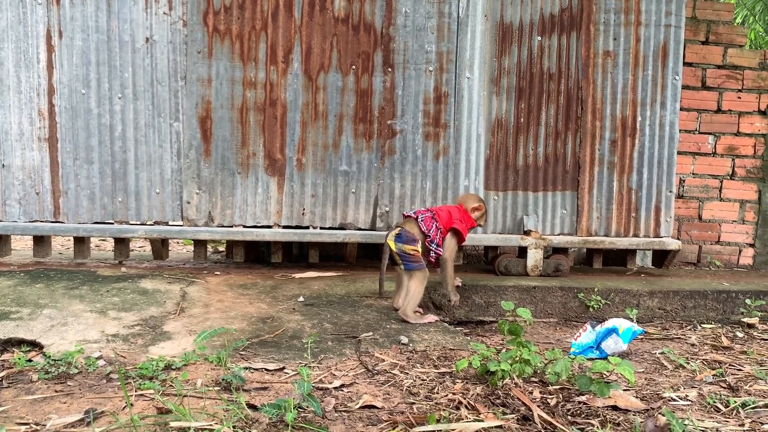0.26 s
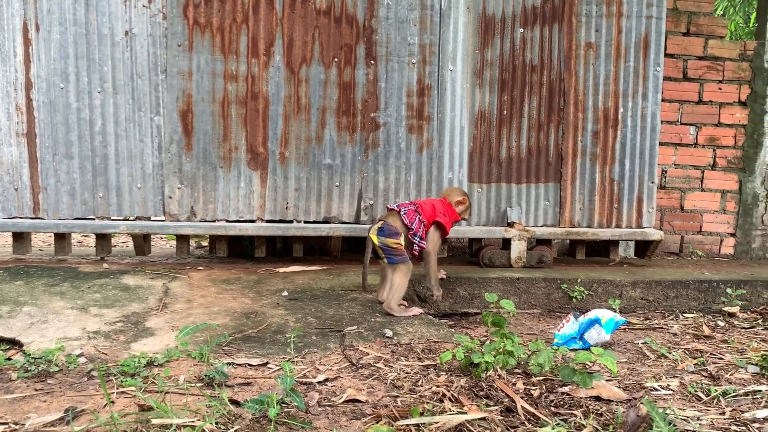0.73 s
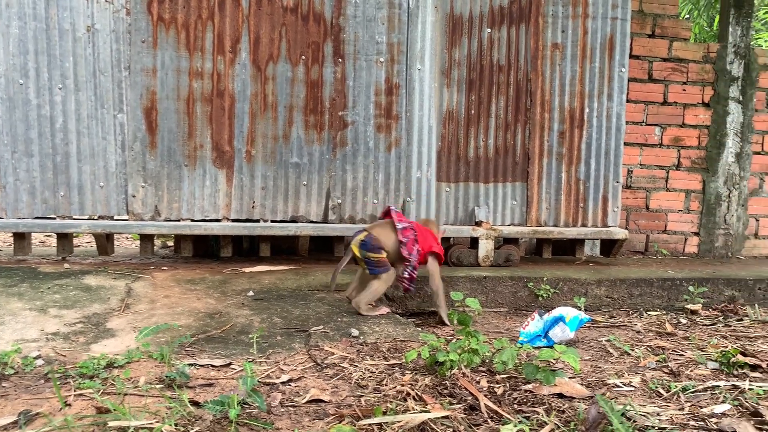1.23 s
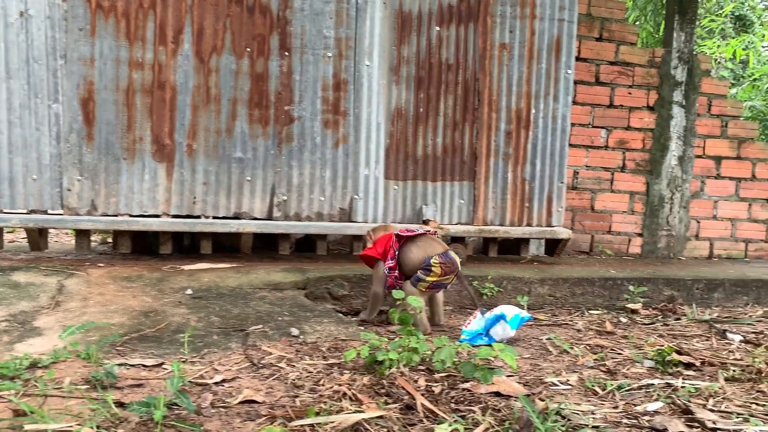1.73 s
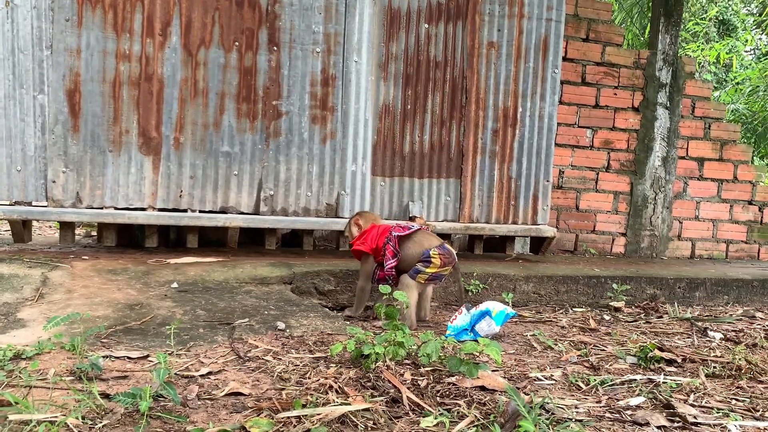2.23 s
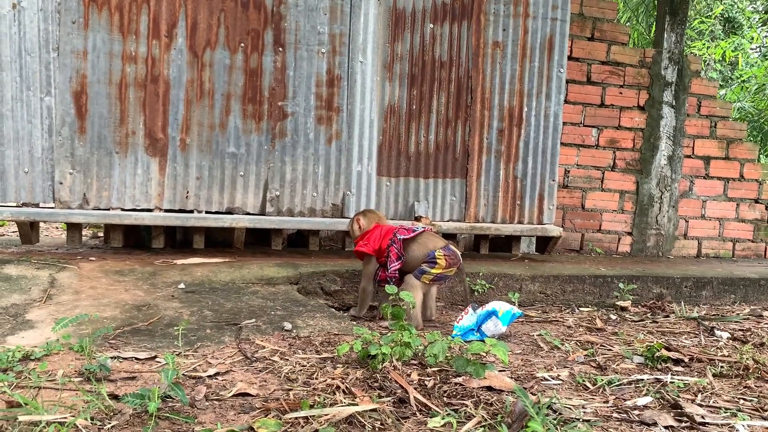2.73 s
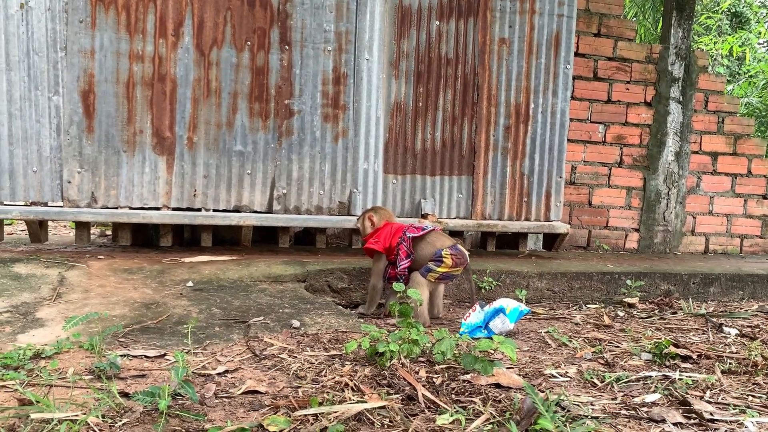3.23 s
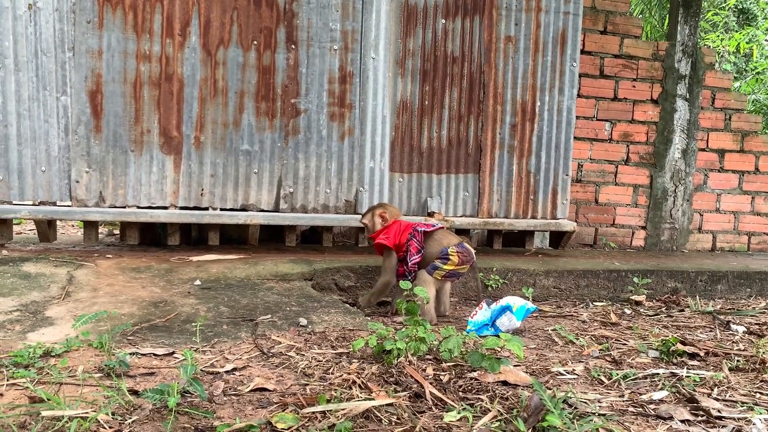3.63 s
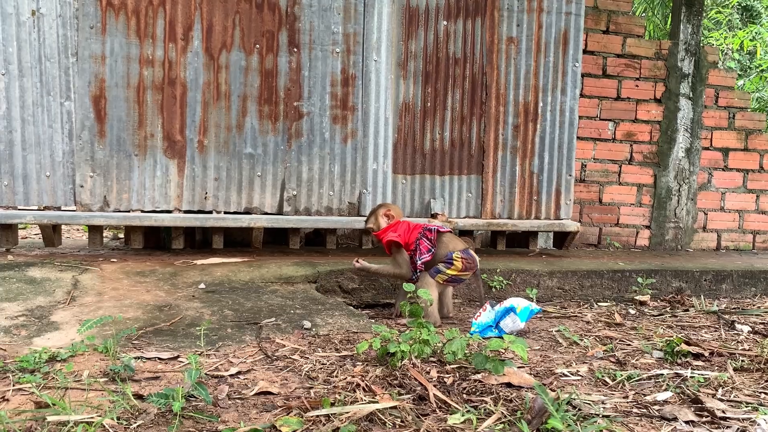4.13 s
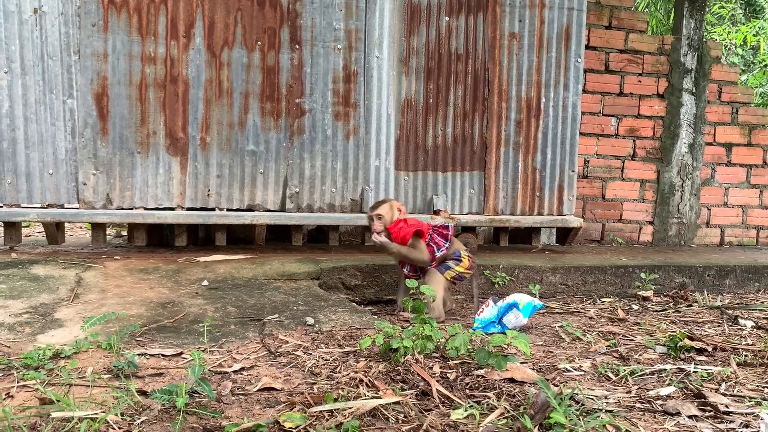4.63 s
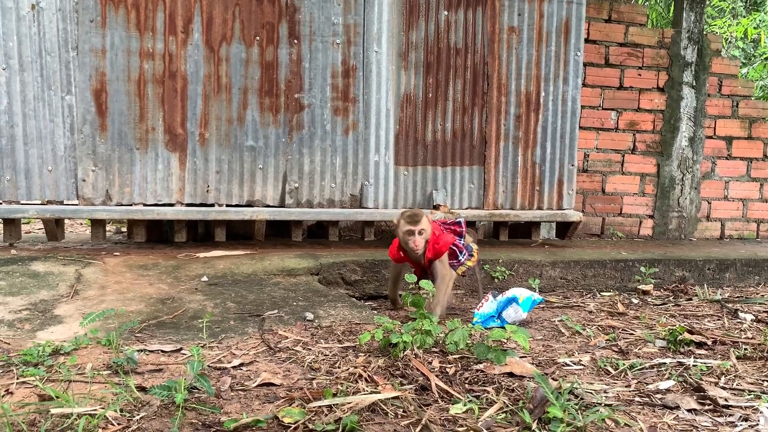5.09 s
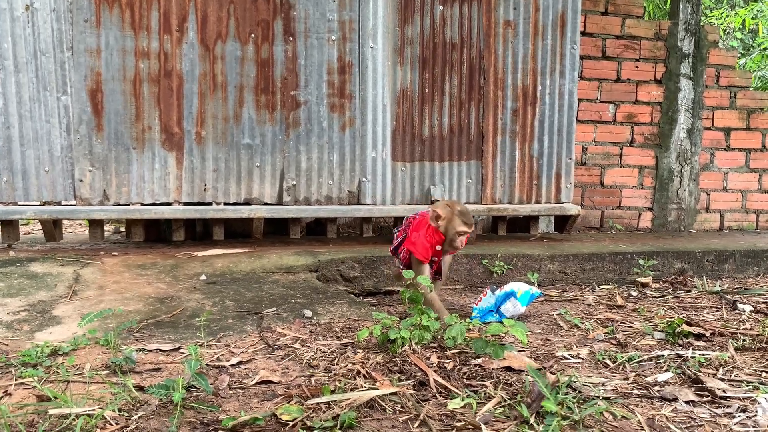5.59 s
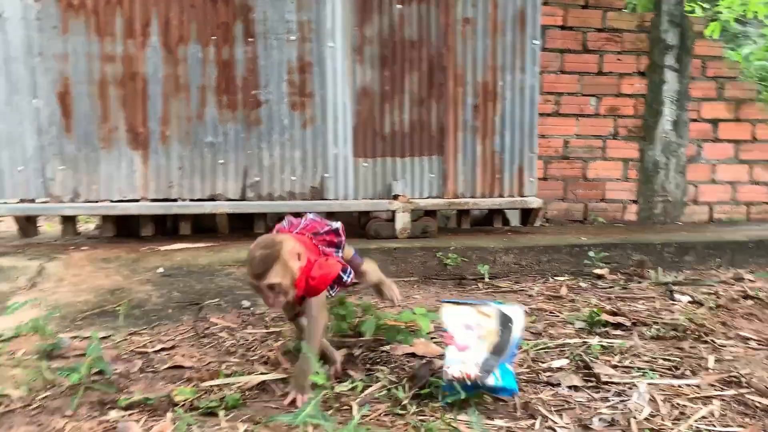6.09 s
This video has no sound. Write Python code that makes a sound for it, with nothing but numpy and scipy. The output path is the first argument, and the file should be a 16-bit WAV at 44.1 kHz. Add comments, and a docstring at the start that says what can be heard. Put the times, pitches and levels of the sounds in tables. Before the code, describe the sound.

A quiet village yard heard in stereo, with low airy rumble, faint hiss and distant engine drone. From the start, chicks give short falling peeps about three times a second until 2 seconds, mixed with quick chirps and thin high notes; sparser chirps and clear, held whistles continue throughout, a longer whistle around 5. Walls return a short, diffuse echo. Hoarse roosters crow faintly far off, drawn out and wavering. High insects sizzle softly, one throbbing about eight times a second, fading after 3. Dull soft thuds fall at 0.2 and 0.8, a tight cluster of knocks at 3.8, another thud at 4.9. Engines swell a little after 4. Knocks at 5.9 precede an abrupt silence of a twentieth of a second; from 6.0 to the end, at about 6.3, paws rustle crisply through dry leaves nearby, with snapping twigs, hollow knocks and one last chirp.

```python
"""A village yard: chicks and small birds peep between walls, roosters crow far off, insects sing, traffic rumbles.
Bird voices are sines on gliding pitch curves, and a decaying noise tail gives the walls' echo. Knocks ring a damped
mode; insects are ticks through resonances; traffic, leaves and air are shaped noise.
Near the end the sound drops out for a moment, then an animal rustles close by through dry leaves."""
import sys
import numpy as np
from scipy import signal
from scipy.io import wavfile
from scipy.ndimage import uniform_filter1d

SR = 44100
rng = np.random.default_rng(int(sys.argv[2]) if len(sys.argv) > 2 else 0)


def transcribe(u):
    """Save the signal u as a 16-bit wav file named by the first command-line argument.

    u: samples, shape (n,) or (channels, n), limited to [-1, 1]; the rate is SR.
    q: integer samples, one column per channel.
    """
    v = np.clip(np.atleast_2d(u).T, -1, 1)
    q = np.round(v * 32767).astype(np.int16)
    wavfile.write(sys.argv[1], SR, q)


N = 280035


def from_db(db):
    """Decibels to gain."""
    return 10 ** (np.asarray(db) / 20)


def rms_one(x):
    """Scale to unit rms."""
    return x / np.sqrt(np.mean(x ** 2) + 1e-20)


def in_time(rows):
    """Every column of a curve table at every sample."""
    s, *columns = np.transpose(rows)
    return [np.interp(np.arange(N) / SR, s, column) for column in columns]


def at_hz(points, hz):
    """Read a spectrum on a log-frequency axis."""
    point_hz, values = np.array(points).T
    return np.interp(np.log(hz), np.log(point_hz), values)


def drift(rate_hz):
    """Random wander of rms 1: noise through two equal low-pass poles, drawn every 20 samples."""
    r = np.exp(-40 * np.pi * rate_hz / SR)
    noise = rng.standard_normal(N // 20 + 4002)
    slow = signal.lfilter([1], [1, -2 * r, r * r], noise)[4000:]   # skip the filter's start
    return np.interp(np.arange(N) / 20, np.arange(len(slow)), rms_one(slow))


def resonance(x, hz, width_hz):
    """Two-pole resonance with a gain of about 1 at its peak."""
    r = np.exp(-np.pi * width_hz / SR)
    poles = [1, -2 * r * np.cos(2 * np.pi * hz / SR), r * r]
    return signal.lfilter([(1 - r * r) / 2, 0, (r * r - 1) / 2], poles, x)


def placed(x, pan_db):
    """Set a source in stereo: the left leads by ten samples and is louder by pan_db."""
    return np.array([np.roll(x, -10) * from_db(pan_db / 2), x * from_db(-pan_db / 2)])


def stereo_noise(alike):
    """Two white noises that share a part."""
    mid, side = rng.standard_normal((2, N))
    alike = np.clip(alike, -1, 1)
    return np.sqrt(.5 + alike / 2) * mid + np.sqrt(.5 - alike / 2) * side * [[1], [-1]]


def banded(spectrum, patchy_db, grains=1):
    """Third-octave bands of stereo noise, each with its own level, flicker and likeness; rms 1."""
    # How alike the two channels are: f/Hz, left-right likeness
    likeness = [(60, 0.84), (240, 0.85), (950, 0.27), (3770, -0.11), (15000, -0.59)]
    out = 0
    edges = 35 * 2 ** (np.arange(27) / 3)
    white = rng.standard_normal((2, 2, N)) * grains
    for k, (low, high) in enumerate(zip(edges, edges[1:])):
        band = signal.butter(2, [low, high], "band", fs=SR, output="sos")
        mid, side = signal.sosfilt(band, white[k % 2])   # neighbouring bands use different noise
        hz = np.sqrt(low * high)
        alike = np.clip(at_hz(likeness, hz), -1, 1)
        gain = from_db(at_hz(spectrum, hz) + patchy_db * drift(3.58))
        out = out + gain * (np.sqrt(1 + alike) * mid + np.sqrt(1 - alike) * side * [[1], [-1]])
    return rms_one(out)


def held_tones(tables, waver, flutter_db, rate_hz, fade_s, octave_db=-58.0):
    """Sines on a pitch curve with a faint octave; pitch and level tremble, the ends fade."""
    out = np.zeros(N)
    tremble = 1 + waver * drift(rate_hz)
    flutter = from_db(flutter_db * drift(rate_hz))
    for rows in tables:
        s, hz, level_db = np.transpose(rows)
        span = slice(round(s[0] * SR), min(round(s[-1] * SR), N))
        t = np.arange(N)[span] / SR
        fade = np.clip(np.minimum(t - s[0], s[-1] - t) / fade_s, 0, 1)
        pitch = uniform_filter1d(np.interp(t, s, hz), size=400, mode="nearest")   # the syrinx rounds every bend
        phase = 2 * np.pi * np.cumsum(pitch * tremble[span]) / SR
        voice = np.sin(phase) + from_db(octave_db) * np.sin(2 * phase)
        level = np.sqrt(2) * from_db(np.interp(t, s, level_db))   # table levels are rms
        out[span] += level * flutter[span] * fade * voice
    return out


def peep(start, length, top_hz, db):
    """One straight fall in pitch whose level curve starts high and sinks; the voice fades its ends."""
    end_hz, start_db, end_db = 2476, 9.5, -2   # levels relative to the middle
    return [(start, top_hz, db + start_db),
            (start + length / 2, (top_hz + end_hz) / 2, db),
            (start + length, end_hz, db + end_db)]


def chirp(start, glide, top_hz, knee_hz, end_hz, db):
    """A glide slows towards a knee, then drops quickly; the throat sets the level at each pitch."""
    # Throat resonances: f/Hz, gain/dB
    throat = [(1700, 9), (2400, 13), (2900, -9), (3450, 0), (3900, -0.5), (4500, -1.5), (5400, -10)]
    glide_bend, drop_s = 1.3, 0.024
    t = np.linspace(0, glide + drop_s, 30)
    hz = knee_hz + (top_hz - knee_hz) * np.clip(1 - t / glide, 0, 1) ** glide_bend
    hz = hz - (knee_hz - end_hz) * np.clip((t - glide) / drop_s, 0, 1)
    return np.transpose([start + t, hz, db + at_hz(throat, hz)])


def slide(start, length, first_hz, last_hz, db, fade_db=0):
    """A straight slide in pitch and level."""
    return [(start, first_hz, db), (start + length, last_hz, db + fade_db)]


def small_birds():
    """Peeps, chirps and high notes share one trembling voice with a clear octave."""
    # Short peeps: start t/s, length/s, top f/Hz, middle level/dB before the mix
    peep_rows = [(0.173, 0.066, 4550, -65.5), (0.542, 0.062, 4650, -63.5), (0.906, 0.09, 4546, -67.5),
                 (1.255, 0.058, 4620, -63.5), (1.601, 0.086, 4610, -67.5), (1.962, 0.067, 4404, -67.5),
                 (3.388, 0.046, 4050, -76.5), (3.621, 0.1, 4360, -80)]
    # Chirps: start t/s, glide/s, top f/Hz, knee f/Hz, end f/Hz, level/dB before throat and mix
    chirp_rows = [(0.474, 0.08, 4473, 3985, 3830, -67), (1.071, 0.1, 4595, 3527, 2280, -66.5),
                  (1.495, 0.066, 4270, 3260, 2830, -63.5), (2.164, 0.08, 4460, 3480, 2190, -63.5),
                  (2.319, 0.043, 4400, 3400, 3120, -63.5), (2.442, 0.05, 4375, 3380, 2540, -59),
                  (2.63, 0.056, 4020, 3780, 1680, -72.5), (3.0, 0.12, 5100, 3366, 2256, -62),
                  (3.234, 0.034, 4400, 3510, 2134, -65.5), (4.323, 0.068, 4030, 3390, 2280, -64),
                  (4.557, 0.065, 4680, 3380, 3080, -65), (4.641, 0.075, 5090, 3900, 2980, -74.5),
                  (4.778, 0.043, 4435, 3860, 1870, -71), (5.169, 0.073, 4960, 3650, 3270, -65.5),
                  (5.563, 0.048, 4655, 4310, 3450, -66), (2.69, 0.064, 4590, 3420, 3120, -67),
                  (5.82, 0.13, 5290, 3470, 3100, -68), (6.273, 0.085, 4815, 3630, 3000, -58.5)]
    # High thin notes, mostly leading into a chirp: start t/s, length/s, first f/Hz, last f/Hz,
    # starting level/dB before the mix
    high_rows = [(0.418, 0.057, 5860, 5080, -67), (0.566, 0.032, 6200, 5680, -71),
                 (1.007, 0.089, 5950, 4920, -69.5), (1.165, 0.057, 5680, 4780, -66),
                 (1.431, 0.069, 5450, 5206, -65.5), (2.102, 0.15, 5640, 5100, -75.5),
                 (2.384, 0.07, 5620, 5660, -62.5), (2.955, 0.072, 5400, 5290, -64.5),
                 (1.48, 0.06, 4770, 4760, -67), (2.556, 0.055, 4520, 4370, -71),
                 (4.262, 0.064, 5230, 4640, -68), (5.127, 0.047, 5260, 4800, -71),
                 (5.52, 0.045, 6420, 4950, -69), (5.547, 0.054, 4800, 4710, -68)]
    notes = [peep(*row) for row in peep_rows]
    notes += [chirp(*row) for row in chirp_rows]
    notes += [slide(*row, fade_db=-12) for row in high_rows]
    return held_tones(notes, waver=.017, flutter_db=4.0, rate_hz=220, fade_s=.017, octave_db=-26.0)


def whistle(start, length, onset_hz, held_hz, end_hz, db):
    """Settles on its note, slides with gathering speed, swells and fades."""
    settle_s, bend = 0.0334, 2.1
    swell_peak, start_db, end_db = 0.49, -10, -6.5   # peak as a share of the length
    t = np.linspace(0, length, 30)
    hz = np.interp(t, [0, settle_s], [onset_hz, held_hz])
    hz = hz + (end_hz - held_hz) * (t / length) ** bend
    swell_db = np.interp(t / length, [0, swell_peak, 1], [start_db, 0, end_db])
    return np.transpose([start + t, hz, db + swell_db])


def whistles():
    """Held bird notes: near-pure sines with a gentle tremble."""
    # Whistles: start t/s, length/s, onset f/Hz, held f/Hz, end f/Hz, peak level/dB before flutter
    rows = [(0.721, 0.19, 3500, 3460, 3715, -68), (1.62, 0.26, 3900, 3683, 3555, -64),
            (1.907, 0.1, 3900, 4020, 3870, -60.5), (2.77, 0.11, 3580, 3670, 3595, -61),
            (3.817, 0.28, 3850, 3690, 3190, -67), (4.148, 0.15, 3950, 3766, 3820, -64),
            (4.94, 0.48, 3760, 3696, 3897, -64.5), (5.371, 0.17, 4050, 4020, 3544, -64),
            (6.006, 0.14, 3660, 3685, 3655, -60)]
    return held_tones([whistle(*row) for row in rows], waver=.008, flutter_db=2.5, rate_hz=45, fade_s=.031)


def roosters():
    """Far crowing: held partials that waver, in a hoarse haze that follows their loudness."""
    # Partials of the crows: start t/s, length/s, first f/Hz, last f/Hz, level/dB before flutter and mix
    rows = [(.3, 0.33, 1536, 1634, -75), (.55, 0.7, 1670, 1664, -75), (1.05, 0.31, 1745, 1780, -80),
            (.88, 0.16, 746, 758, -66), (1.25, 0.49, 1550, 1583, -76.5), (.6, 0.73, 878, 871, -78.5),
            (1.5, 1.39, 947, 995, -78), (1.8, 0.19, 1930, 1795, -79), (2.4, 0.7, 1643, 1693, -74.5),
            (3.97, 2.14, 1523, 1502, -76), (4.0, 0.486, 818, 828, -76), (4.95, 0.87, 1150, 1190, -78),
            (5.5, 0.26, 1593, 1576, -74), (5.1, 0.19, 485, 470, -72.5), (5.2, 0.52, 818, 777.5, -70),
            (5.28, 0.1, 1670, 1656, -60)]
    partials = held_tones([slide(*row) for row in rows], waver=.024, flutter_db=5.5, rate_hz=45, fade_s=.1)
    loudness = uniform_filter1d(np.abs(partials), size=8000)
    partials = partials * from_db(3 * drift(8) - 1.5)   # the crows' level flutters unevenly
    noise = rng.standard_normal(N)
    low_haze = 0.88 * rms_one(resonance(noise, 720, 400))
    high_haze = 0.47 * rms_one(resonance(noise, 1370, 500))
    return partials + loudness * (low_haze + high_haze)


def knocks():
    """Dull knocks on the ground: each a soft blow on one damped mode, with a puff of grit."""
    # Blows: t/s, nominal level/dB before the mix, ring f/Hz
    blows = [(0.172, -42.5, 341), (0.2, -42.5, 362), (0.783, -45.5, 374), (0.81, -48.5, 355),
             (3.738, -52, 950), (3.755, -42.5, 925), (3.763, -44, 790), (3.773, -41, 535),
             (3.78, -37.5, 950), (3.79, -44, 584), (3.8, -43, 950), (4.918, -46.5, 386),
             (4.945, -48.5, 367), (5.872, -39.5, 950), (5.889, -45, 920), (5.908, -31, 924),
             (6.017, -38.5, 875), (6.024, -30.5, 900), (6.028, -27.5, 1320), (6.068, -44, 870),
             (6.133, -41, 820), (6.139, -38.5, 980), (6.187, -33.5, 1360), (6.22, -40, 870),
             (6.225, -33, 1320)]
    cycles_to_60_db = 19.5
    out = np.zeros(N)
    grit = rms_one(resonance(resonance(rng.standard_normal(N), 900, 1500), 900, 1500))
    for start, level_db, hz in blows:
        i = round(start * SR)
        t = np.arange(min(SR // 5, N - i)) / SR
        ring = np.sin(2 * np.pi * hz * t) * from_db(-60 * t * hz / cycles_to_60_db)
        puff = 0.097 * hz / 900 * grit[i:i + len(t)] * np.exp(-t / 0.011)
        contact = np.sin(np.pi / 2 * np.minimum(t * hz / 2, 1)) ** 2   # soft rise over two cycles
        out[i:i + len(t)] += from_db(level_db) * contact * (ring + puff)
    return out


def leaves():
    """Dense crackle of grainy noise under the paws, with clicks ringing as single twigs snap."""
    # Loudness of the rustle: t/s, level/dB
    rustle = [(6.008, -46.5), (6.04, -41.5), (6.07, -49.5), (6.15, -53), (6.19, -43), (6.25, -48.5),
              (6.35, -54.5)]
    # Colour of dry leaves: f/Hz, relative band level/dB
    leaf_colour = [(180, 1), (300, -13.5), (603, -15), (834, -17.5), (2390, -12.5), (3770, -16.5),
                   (4970, -19), (8350, -15.5), (14500, -25)]
    # Twigs snapping: t/s, click level/dB before the resonances
    twigs = [(6.023, -53), (6.04, -27.5), (6.046, -35), (6.182, -34), (6.191, -30), (6.199, -42),
             (6.2228, -23)]
    near = np.arange(N) / SR > rustle[0][0]
    crackle = banded(leaf_colour, patchy_db=2.5, grains=from_db(3.0 * drift(150)))
    clicks = np.zeros(N)
    clicks[[round(s * SR) for s, db in twigs]] = from_db(np.array(twigs)[:, 1])
    snaps = 1.5 * resonance(clicks, 8200, 3000)
    snaps = snaps + resonance(clicks, 4200, 2500) + 4 * resonance(clicks, 2000, 1200)
    return near * from_db(in_time(rustle)[0]) * crackle + placed(snaps, 1.2)


def insects():
    """Dense ticks ring each singer's body; one singer throbs about eight times a second."""
    # Insect song: t/s, steady singer's base level/dB, throbbing singer's base level/dB
    song_levels = [(0.0, -62.5, -67.5), (1.1, -62.5, -68), (1.85, -62.5, -64.5), (2.8, -64, -65),
                   (2.95, -63.5, -71), (5.95, -62, -71)]
    ticks_per_s = 6000
    steady_db, throb_db = in_time(song_levels)
    t = np.arange(N) / SR
    top_s, slows_s, fast_hz, slow_hz = .297, 2.34, 8.32, 7.6   # first throb peak, then the two throb rates
    throbs = fast_hz * (np.minimum(t, slows_s) - top_s) + slow_hz * np.maximum(t - slows_s, 0)
    depth = np.clip(.45 + .05 * (throb_db + 64), 0, 1)   # the louder, the deeper
    sway = np.cos(2 * np.pi * (t - 1.22) / .97)   # the steady song leans high, then low
    high_steady = from_db(steady_db - 10.5 + 5.2 * sway)
    low_steady = from_db(steady_db - 9.5 - 6.6 * sway)
    throbbing = from_db(throb_db) * (1 + depth * np.cos(2 * np.pi * throbs))
    singers = [(high_steady, 8200, 520, -13.5), (low_steady, 7820, 540, -6.0),
               (throbbing, 9322, 570, -9.0), (from_db(-70.5), 11270, 1700, -2.0)]   # gain, f/Hz, width/Hz, pan/dB
    out = 0
    for level, hz, width_hz, pan_db in singers:
        ticks = (rng.random(N) < ticks_per_s / SR) * rng.standard_normal(N)
        song = placed(rms_one(ticks), pan_db) + .5 * rng.standard_normal((2, N))   # far singers blur to hiss
        out = out + level * rms_one(resonance(resonance(song, hz, width_hz), hz, width_hz))
    return signal.sosfilt(signal.cheby2(6, 40, [7200, 12700], "band", fs=SR, output="sos"), out)


def traffic():
    """Far engines: noise in a few low resonances, louder and earlier on the right."""
    # Engine loudness before panning: t/s, deep rumble level/dB, drone base level/dB
    engine_levels = [(0.0, -45, -52.5), (0.21, -62.5, -53), (4.03, -56, -48.5), (4.7, -50.5, -55.5),
                     (5.31, -50.5, -46), (6.35, -63, -52)]
    # Rumble resonance, applied twice: f/Hz, width/Hz of each pass
    rumble = (50.44, 15)
    # Drone resonances: f/Hz, width/Hz, relative level/dB
    drone_modes = [(81.4, 4.7, -1), (115.2, 8, -1), (130.3, 16.5, -8.5), (168, 56, -27.5), (278.5, 13, -20)]
    deep_db, drone_db = in_time(engine_levels)
    deep = resonance(resonance(stereo_noise(0.85), *rumble), *rumble)
    drone = sum(from_db(db) * rms_one(resonance(stereo_noise(0.95), hz, width_hz))
                for hz, width_hz, db in drone_modes)
    drone = signal.sosfilt(signal.butter(2, [55, 330], "band", fs=SR, output="sos"), drone)
    left, right = from_db(deep_db) * rms_one(deep) + from_db(drone_db) * rms_one(drone)
    return np.array([np.roll(left, 25) * from_db(-2.5), right * from_db(1.0)])


def open_air():
    """The yard's background: patchy banded noise, strongest in the bass."""
    # Colour of the air: f/Hz, relative band level/dB
    air_colour = [(24, -63), (40, -3.5), (119, 0.5), (371, -26.5), (900, -30), (1500, -37.5), (2450, -37.5),
                  (3690, -34), (5310, -47), (7100, -47.5), (9260, -44.5), (11800, -38.5), (13000, -89)]
    air = from_db(-52) * banded(air_colour, patchy_db=5.5)
    # the air's hiss stops short below 13 kHz
    air = signal.sosfilt(signal.cheby2(8, 40, 12800, fs=SR, output="sos"), air)
    air[0] = np.roll(air[0], 25)   # like the traffic, earlier on the right
    return air


def yard(x):
    """Walls and roofs scatter the calls: a dense decaying tail, different in each channel."""
    yard_t60_s = 0.53
    near_t60_s, near_db = 0.22, 2   # the nearest walls fill the start of the tail
    t = np.arange(round(.6 * SR)) / SR
    decay = from_db(-60 * t / yard_t60_s) + from_db(near_db - 60 * t / near_t60_s)
    tail = rng.standard_normal((2, len(t))) * decay * (1 - np.exp(-t / 0.0015))
    tail = tail * from_db(2.5 * drift(60)[:len(t)])   # echoes come in uneven clumps
    tail = tail / np.sqrt(np.sum(tail ** 2) / 2)
    return signal.fftconvolve(np.broadcast_to(x, (1, N)), tail, axes=1)[:, :N]


def scene():
    """All sources; calls and knocks also come back from the walls."""
    birds, held_notes, crows, blows = small_birds(), whistles(), roosters(), knocks()
    to_walls = birds * from_db(12.0) + held_notes * from_db(4.0)
    to_walls = to_walls + crows * from_db(4.0) + blows * from_db(-6.0)
    voices = birds * from_db(-.5) + held_notes + crows * from_db(-3.0)
    direct = placed(voices, .3) + placed(blows, 1.5)
    echoes = from_db(-5) * yard(to_walls)
    return direct + echoes + leaves() + insects() + traffic() + open_air()


def record(dry):
    """The microphone sheds the deepest bass, the sound drops out briefly, the top is cut."""
    # Silent moment: start t/s, end t/s
    dropout = (5.9595, 6.008)
    dry = signal.sosfilt(signal.butter(3, 36, "high", fs=SR, output="sos"), dry)
    t = np.arange(N) / SR
    fade_out = (dropout[0] - t) / .0005
    fade_in = (t - dropout[1]) / .004
    on = np.clip(np.maximum(fade_out, fade_in), 0, 1)
    return signal.sosfilt(signal.cheby2(12, 70, 15600, fs=SR, output="sos"), dry * on)


dry = scene()
out = record(dry)
transcribe(out)
```